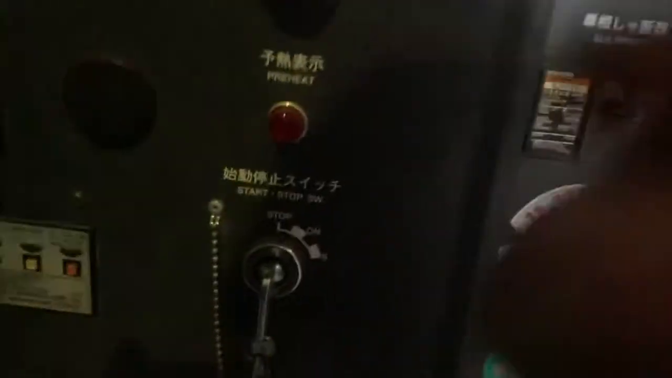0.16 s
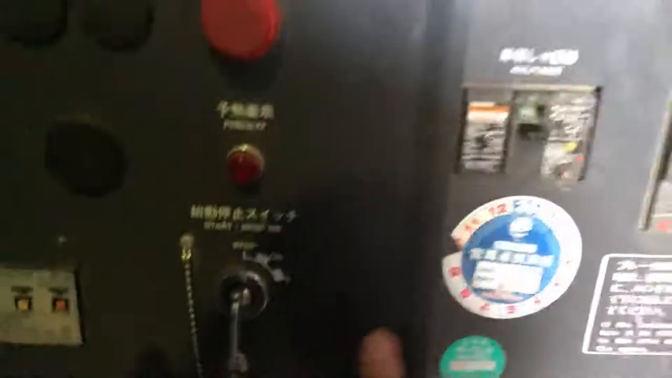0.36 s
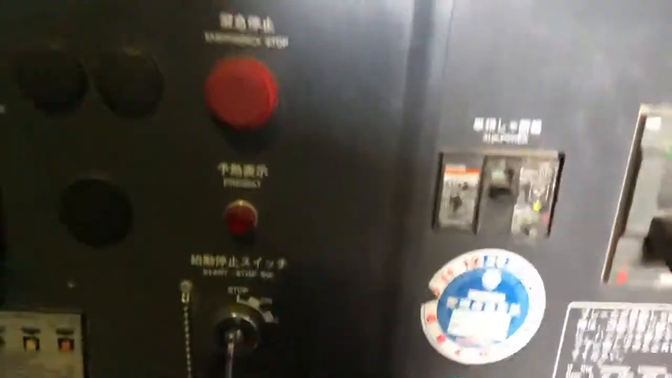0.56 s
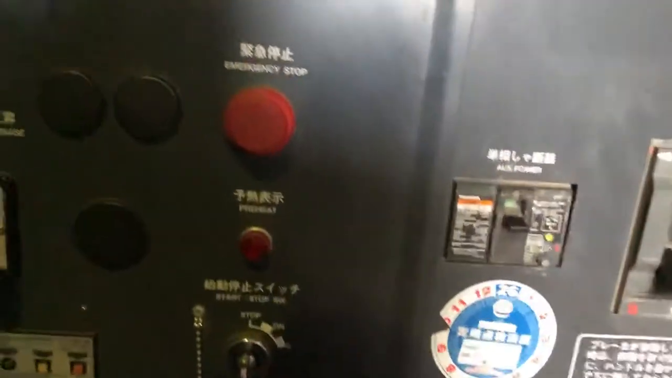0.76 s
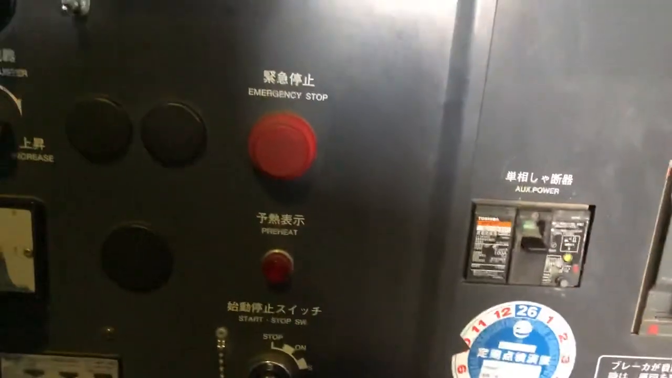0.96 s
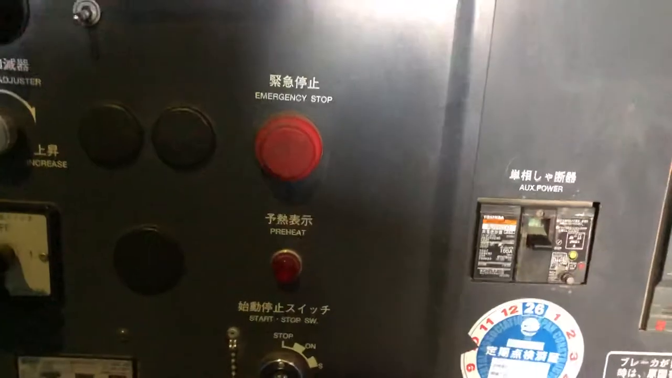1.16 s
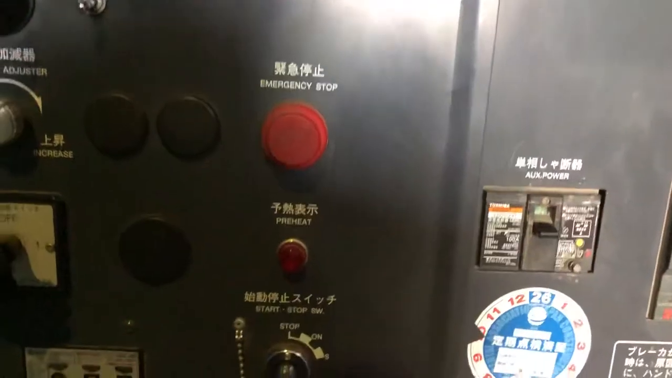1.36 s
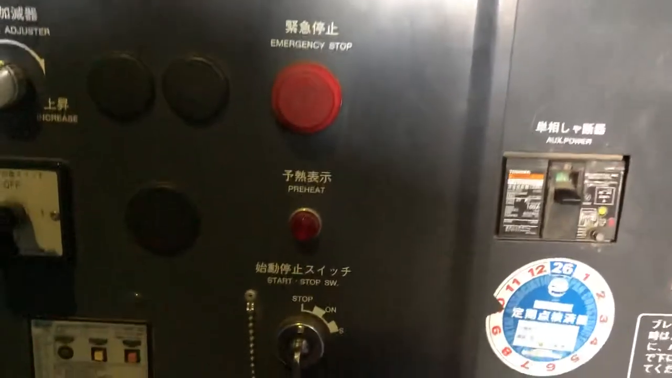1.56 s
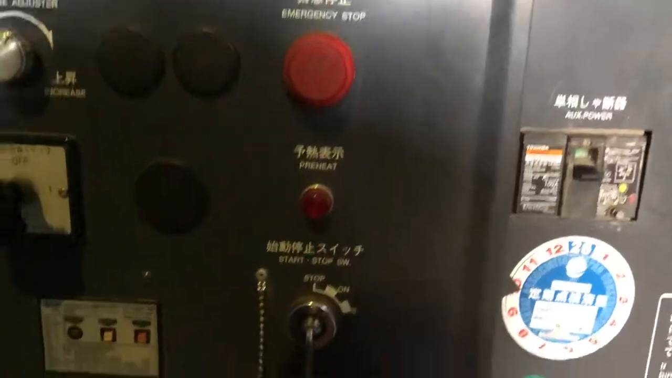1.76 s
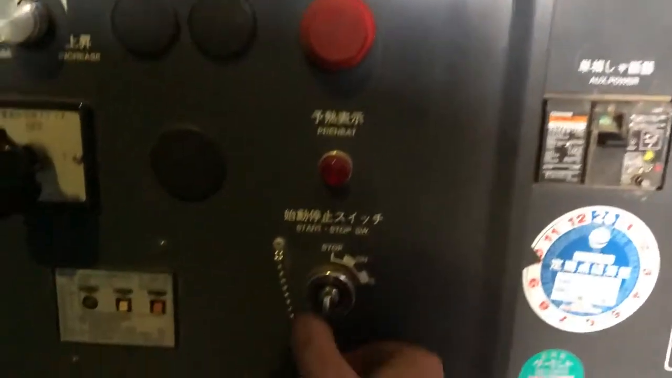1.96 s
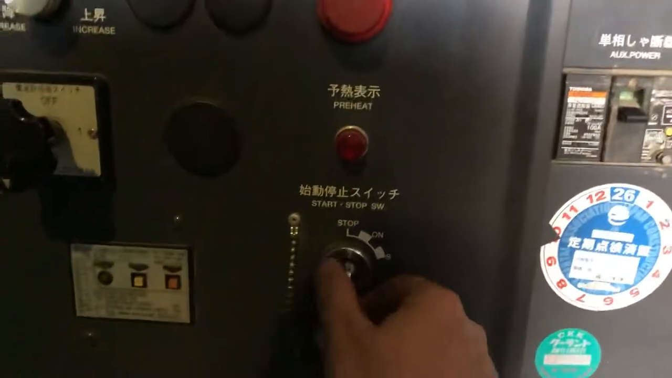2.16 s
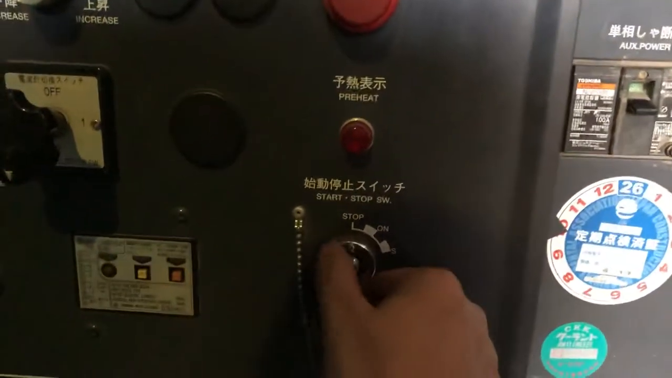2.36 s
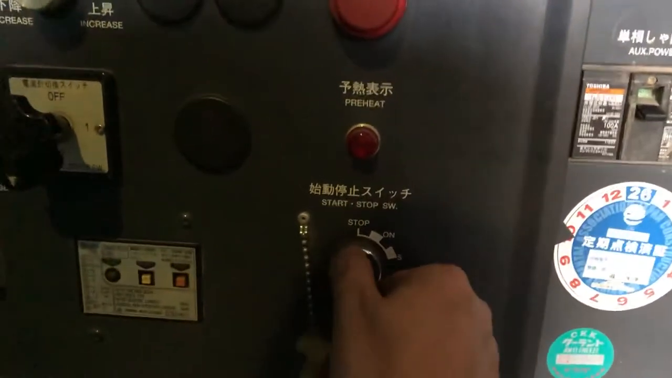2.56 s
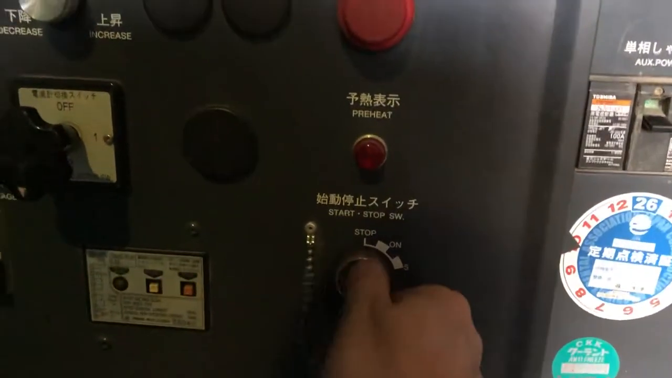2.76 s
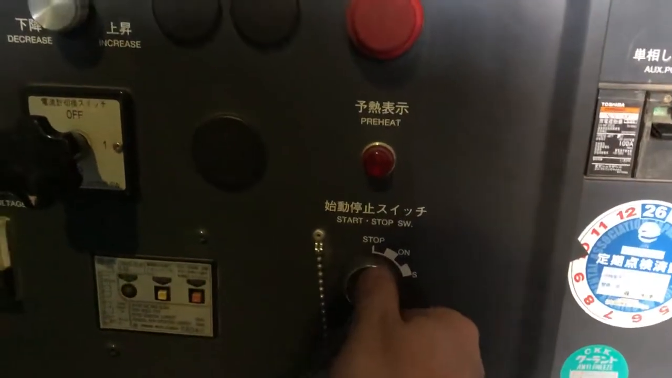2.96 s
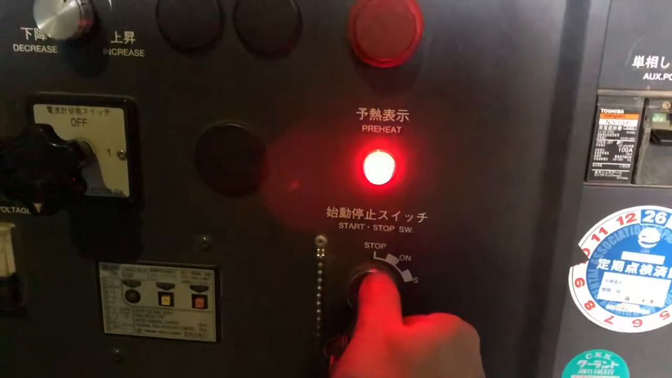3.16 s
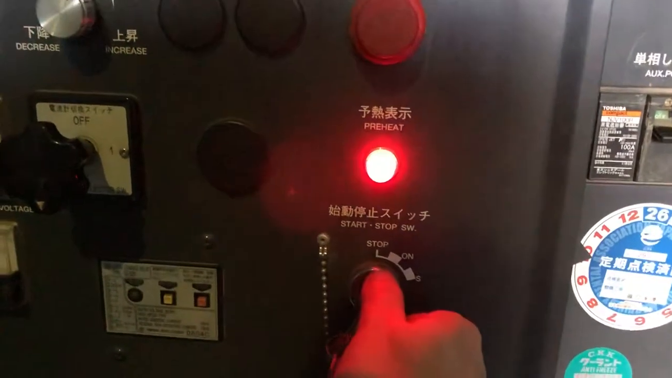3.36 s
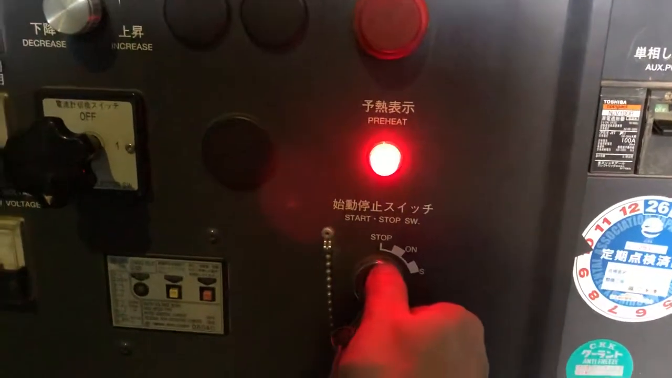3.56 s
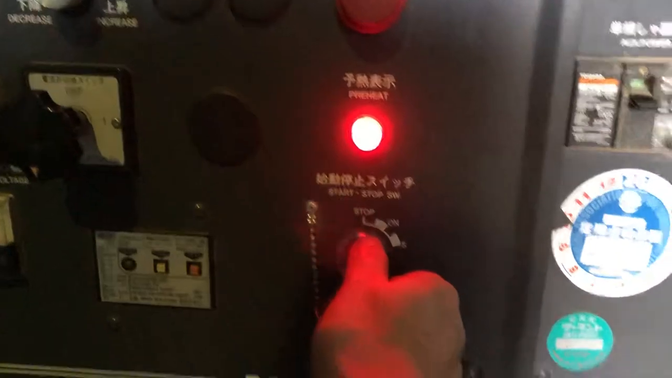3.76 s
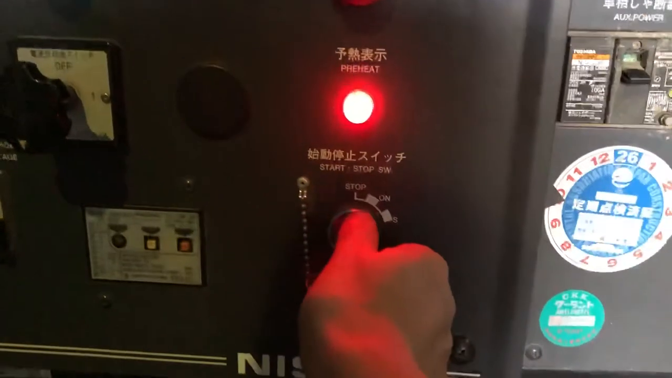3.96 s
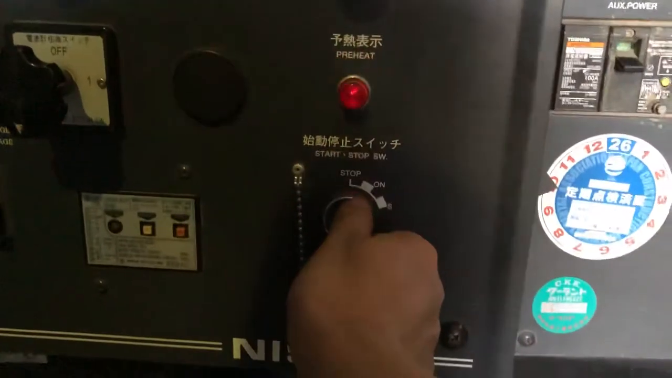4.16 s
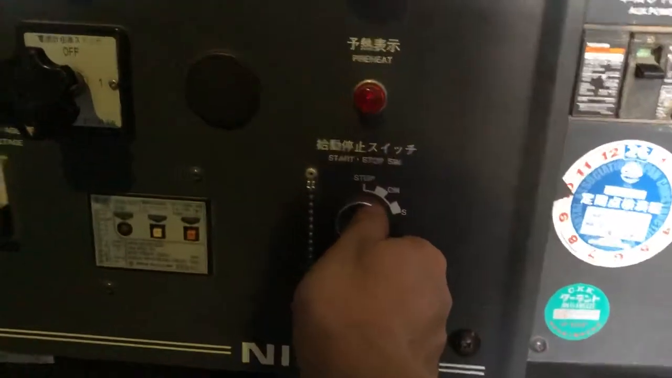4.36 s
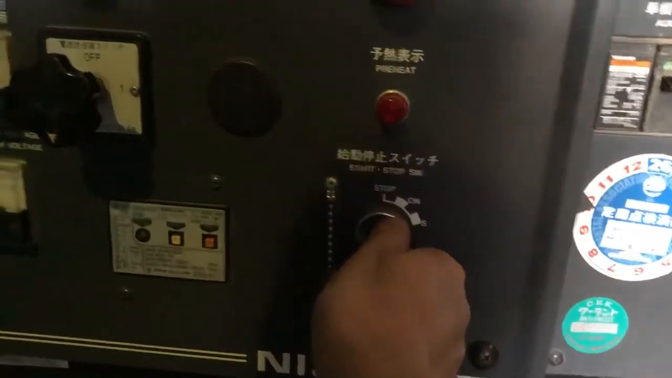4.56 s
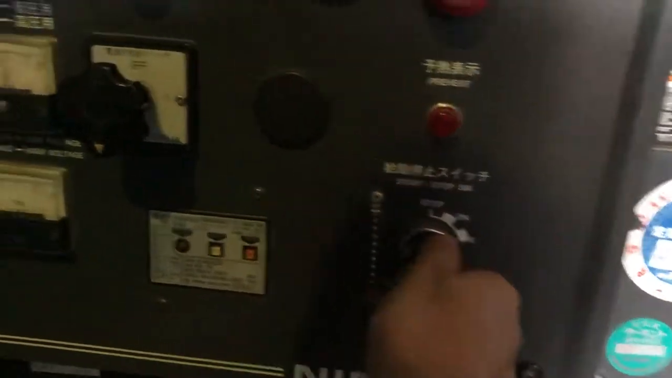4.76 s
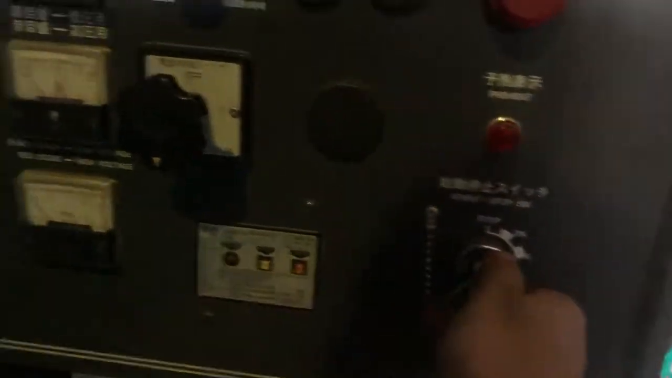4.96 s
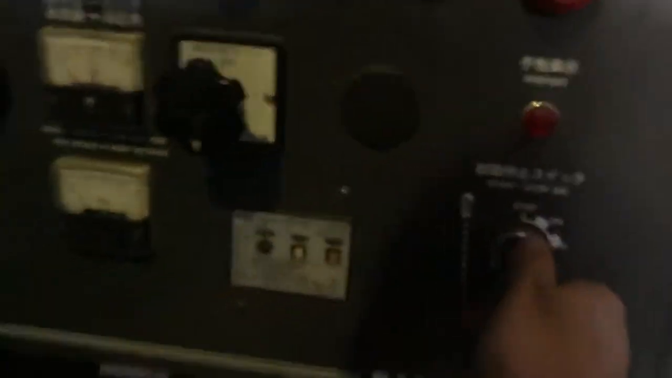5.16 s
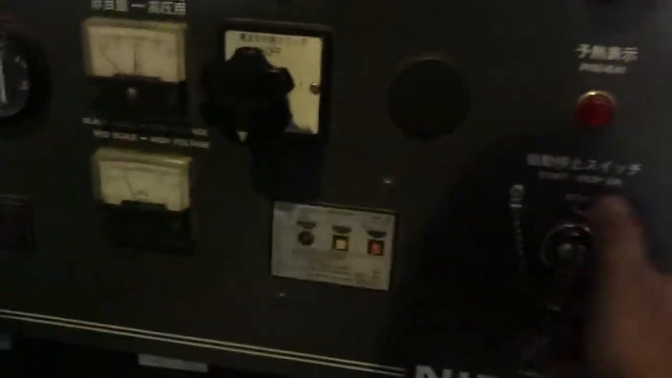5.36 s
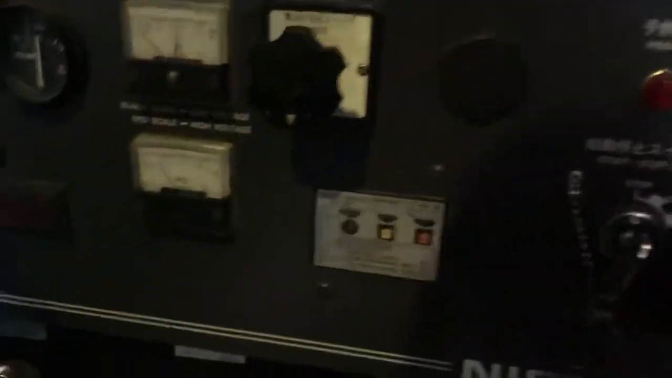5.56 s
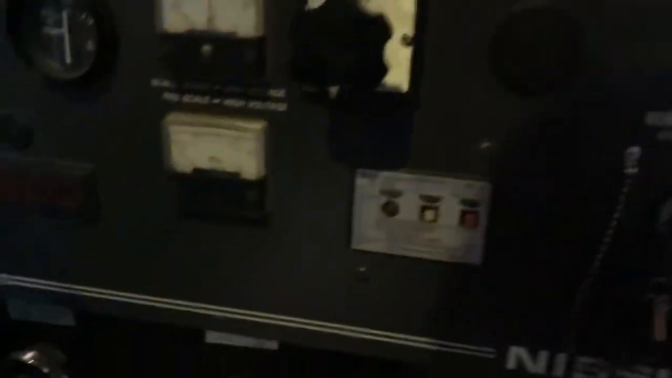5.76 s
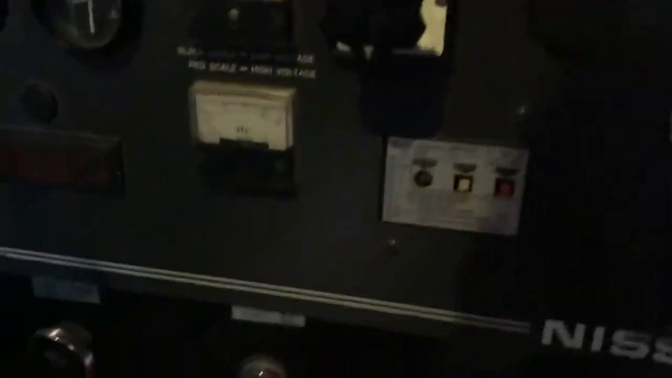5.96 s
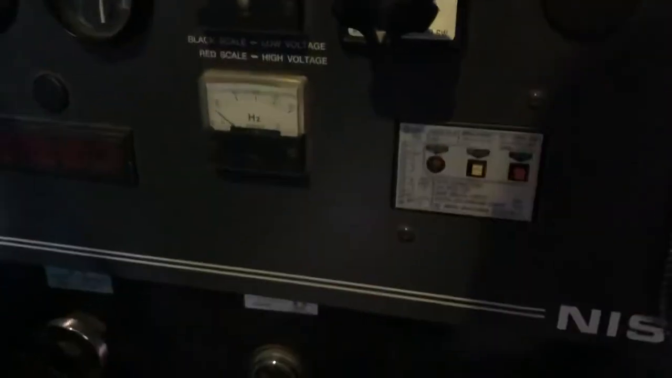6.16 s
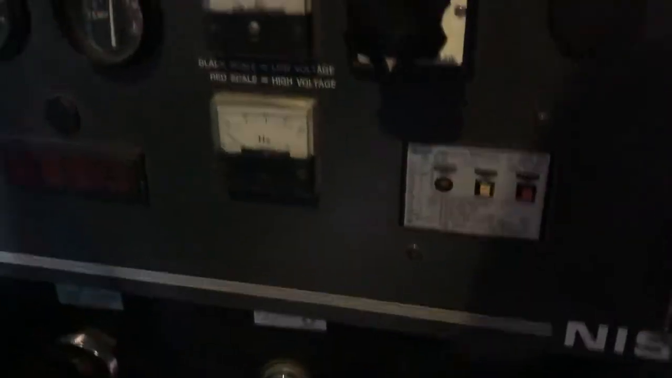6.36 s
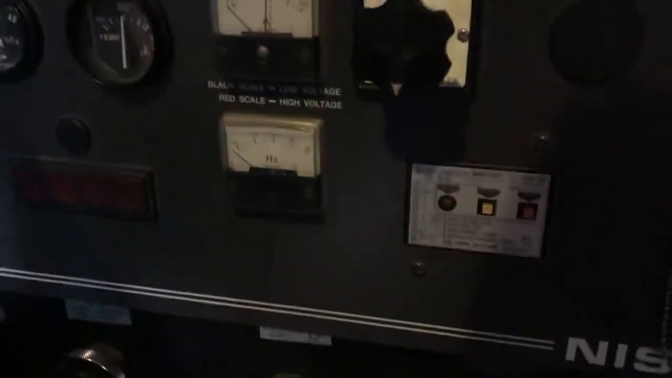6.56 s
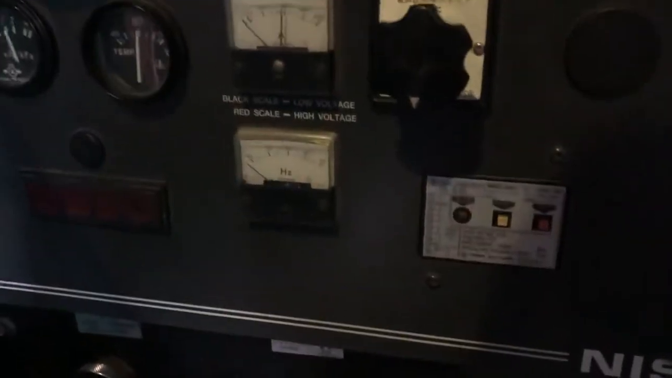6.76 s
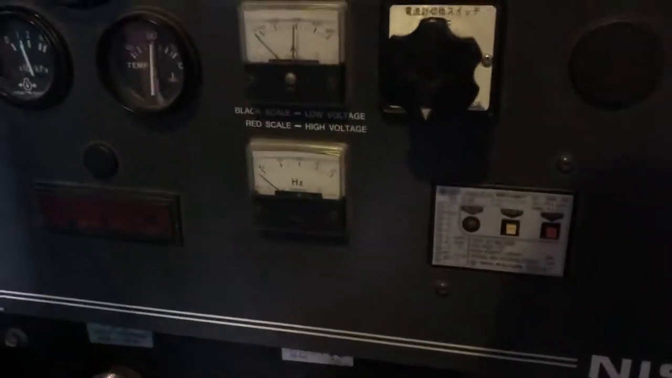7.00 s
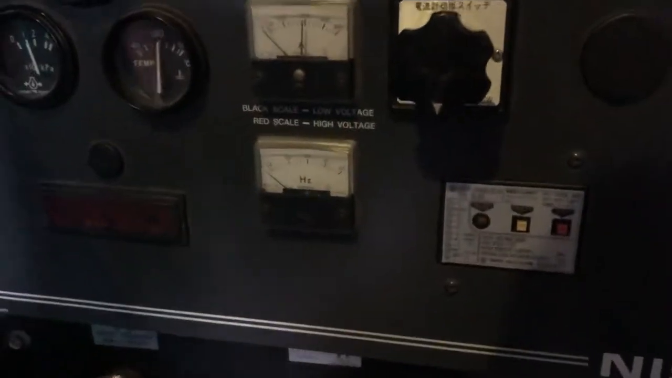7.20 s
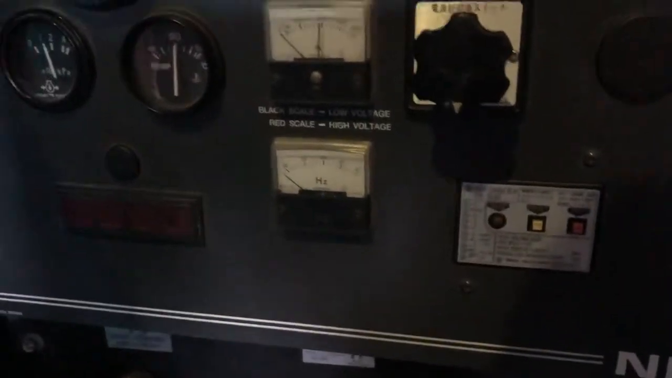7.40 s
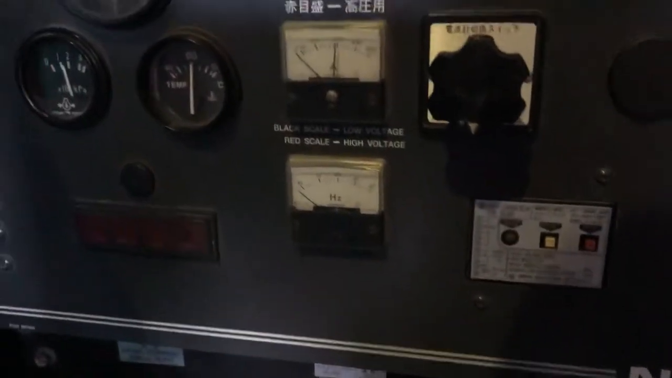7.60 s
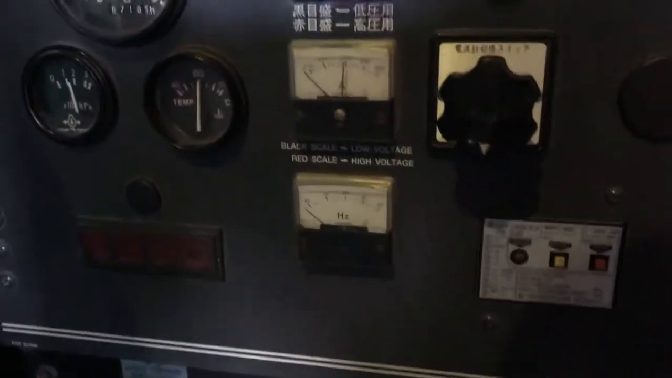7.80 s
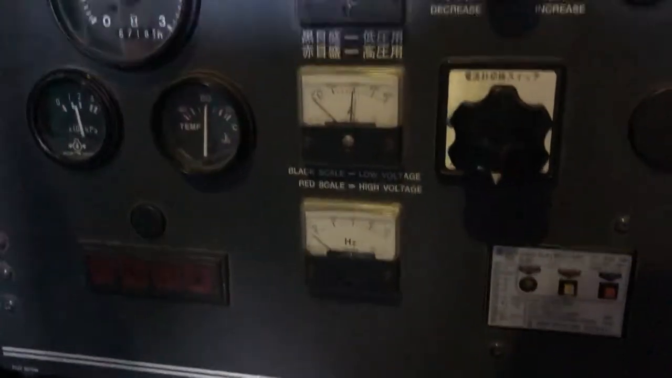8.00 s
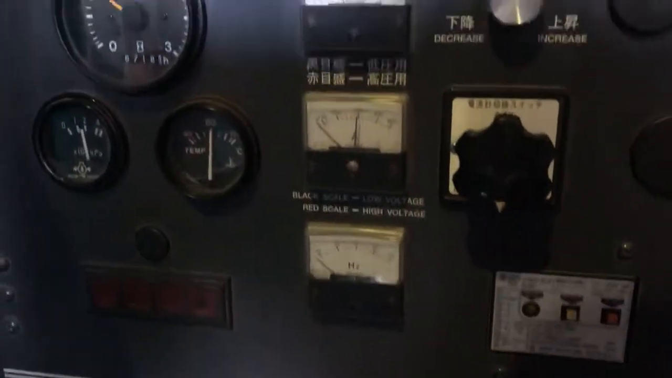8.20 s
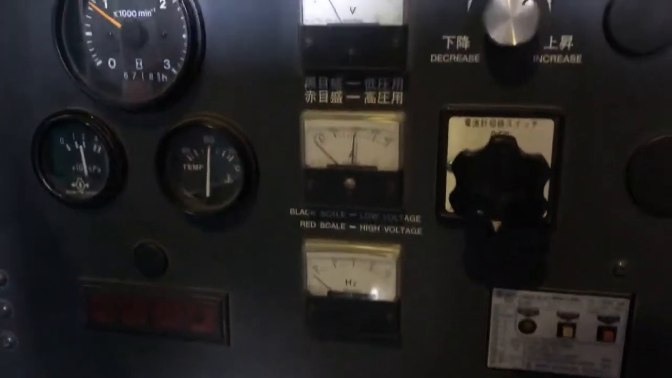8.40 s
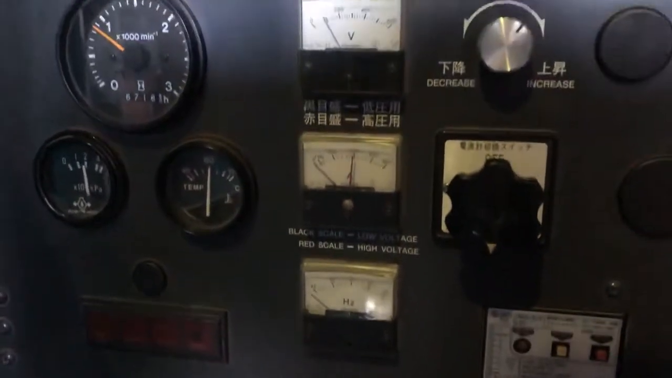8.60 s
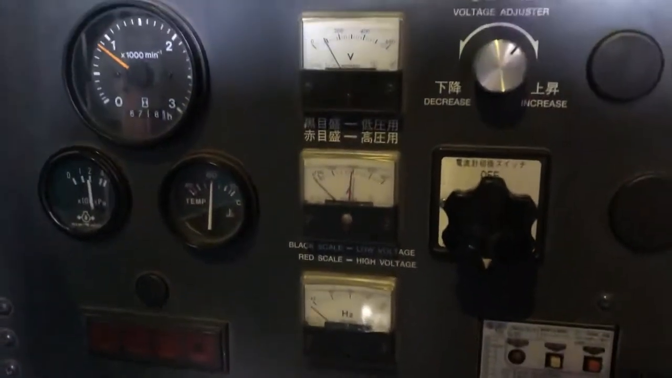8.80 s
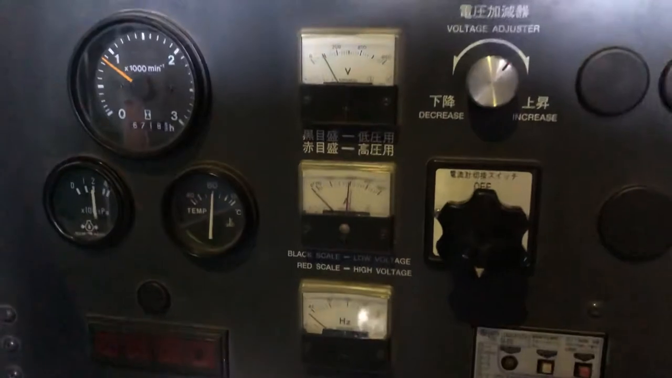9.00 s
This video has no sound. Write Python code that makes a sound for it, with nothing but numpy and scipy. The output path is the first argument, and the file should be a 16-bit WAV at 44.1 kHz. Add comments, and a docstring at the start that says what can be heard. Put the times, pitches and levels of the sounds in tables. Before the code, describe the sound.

A diesel generator starts up indoors, with one microphone in front of its control panel. First come light jingles of a key chain and a cluster of sharp switch clicks over faint, far-off machines. Then the starter slams in, cranks for a moment and whines free as the engine fires. The engine speeds up and runs steadily, knocking in its steel cabinet over a throbbing exhaust and humming fan, while an airy hiss thins.

```python
"""A six-cylinder diesel generator starting up in a plant room, one microphone in front of its panel.
Over a murmur of distant machinery the key chain ticks and slides; the switch and preheat relay snap.
The starter pinion slams in and growls against compression. The engine catches and spins the starter
free in a whine and rasp, overshoots, then idles: each cylinder knocks in the steel cabinet over the
exhaust throb, the hum of the fan and a thinning hiss of cooling air."""
import sys
import numpy as np
from scipy import signal
from scipy.fft import rfft, irfft
from scipy.io import wavfile
from scipy.ndimage import uniform_filter1d

SR = 44100
rng = np.random.default_rng(int(sys.argv[2]) if len(sys.argv) > 2 else 0)


def dump(signal):
    """Clip the signal to [-1, 1] and save it as 16-bit WAV at the path in sys.argv[1]."""
    limited = np.clip(np.atleast_2d(signal).T, -1, 1)
    pcm = np.round(limited * 32767).astype(np.int16)
    wavfile.write(sys.argv[1], SR, pcm)


N = 398663
TIME = np.arange(N) / SR
MESH_S, CATCH_S, KEY_RELEASE_S = 4.41, 4.812, 5.255  # gear bites, engine fires, key is let go

# Each source's broad colour at the microphone. Each row: frequency in Hz, relative level in dB.
ROOM_SPECTRUM = [(15, -50), (25, -30), (48, -2.5), (100, -2), (170, -4.5), (250, -6.5), (330, -12.5),
                 (463, -11.5), (695, -13.5), (1040, -16), (1800, -19), (4500, -29), (7000, -36.5),
                 (16000, -52)]
SLIDE_SPECTRUM = [(2000, -25), (4800, 1), (9000, -11), (16000, -12)]
SNAP_SPECTRUM = [(400, -22), (800, -9), (1150, 2), (2000, 0), (3400, 0), (6000, -1.5), (8000, -2),
                 (12000, -6.5), (15800, -15)]
THUD_SPECTRUM = [(20, -34), (45, -9), (120, -8.5), (280, -0.5), (700, -0.5), (1000, -1), (1400, -9.5),
                 (3300, -5.5), (6000, -17), (16000, -30)]
HOUSING_SPECTRUM = [(60, -3.5), (180, -10), (300, 0.5), (480, -4), (700, -1), (1000, -5), (1550, 0.5),
                    (1900, -1), (2200, -1.5), (3200, -4.5), (4500, -21.5), (8000, -21), (16000, -40)]
CLUTCH_SPECTRUM = [(30, -19), (300, 7), (1000, -0.5), (2100, 2), (2800, 4), (3500, 3), (4500, -1),
                   (7000, -6), (10000, -13), (13000, -20), (15800, -16)]
BLOCK_SPECTRUM = [(150, -27.5), (350, 2.5), (480, 3.5), (650, 0.5), (1050, 1.5), (1500, -1), (2000, -0.5),
                  (2300, -4), (2800, -8.5), (4000, -18.5), (5000, -17), (8000, -26), (16000, -42.5)]
INJECTOR_SPECTRUM = [(1500, -35), (2300, -15), (2750, -4), (3100, -6), (3700, 2), (4100, -4), (4700, -14),
                     (8000, -19), (16000, -34)]
CABINET_SPECTRUM = [(22, -60), (31, -30), (42, -12), (60, -3.5), (85, 0), (135, -2.5), (160, -7),
                    (215, -2.5), (270, -6.5), (340, -3.5), (390, -12), (480, -9.5), (600, -27.5),
                    (1500, -58.5)]
AIR_SPECTRUM = [(1500, -25), (4000, 8.5), (5500, -2), (8000, 1.5), (10500, -3), (13000, -10), (15800, -9)]
# Resonances of the room and the metal parts. Each row: frequency in Hz, width in Hz, strength in dB.
ROOM_MODES = [(97.6, 3.1, 8), (349, 2.9, 10.5), (393, 13, -0.5), (456.6, 1.6, 18), (465.5, 4.7, 8),
              (1057, 46, 0.5), (1872, 29, 4)]
KEY_MODES = [(4870, 58, -33), (6180, 46, -1), (7640, 65, -2), (8390, 49, -3), (10200, 33, 15.5),
             (10750, 110, 5), (11000, 80, -4), (12900, 200, -2), (15400, 150, -1)]
SLIDE_MODES = [(4800, 400, 9), (8400, 150, 6), (10350, 200, 9)]
SNAP_MODES = [(1350, 29, 1.8), (1525, 19, 2.1), (3360, 30, 1.9), (4530, 68, 4), (5200, 200, 2),
              (6100, 90, 2), (10250, 33, 4.6), (15700, 200, 3)]
PANEL_MODES = [(217, 28, 3.6), (263, 41, 1), (318, 13, 5.5), (580, 19, 3), (1427, 29, 17.6),
               (1550, 25, 8.6), (1680, 26, 4.5), (3340, 40, 11), (3650, 53, 5)]
HOUSING_MODES = [(1514, 80, -1), (2970, 500, -9)]
BLOCK_MODES = [(815, 45, -3), (1066, 45, 0), (1281, 40, -2), (1530, 60, -7), (1733, 30, -4), (1882, 30, 3),
               (2030, 55, -2)]
INJECTOR_MODES = [(2730, 430, 8), (3285, 24, 10.5), (3763, 13, 1)]
CABINET_MODES = [(87.8, 3.3, -3), (108.9, 2.65, 13.5), (268, 14, -1.5)]
# Spells of faint jingling. Each row: start and end in seconds, level in dB, brightness (0 is neutral).
JINGLES = [(0.031, .95, -44.5, -2.5), (1.75, 2.3, -46.5, 2.5), (2.4, 3.15, -52, 4)]
# Clear touches of key and chain. Each row: start in seconds, level in dB, brightness.
KEY_TICKS = [(.1, -44, -2), (.321, -43, -2.5), (.763, -39, 0), (.775, -40, 1), (1.206, -34, 0.8),
             (1.595, -38, -1.5), (1.61, -32, -1.5), (1.784, -31, 5.5), (1.803, -47, 4), (1.864, -29, -3.5),
             (1.971, -37.5, 0.5), (2.009, -40, 2), (2.034, -36, 1.5), (2.131, -40, 2), (2.27, -45, 2),
             (2.402, -39, 0), (2.648, -40, 3), (3.285, -49, 3)]
# The chain sliding on the panel. One row: start and fade-out time in seconds, level in dB.
SLIDE = (0.86, 2.7, -68)
# Switch, relay, solenoid and pinion blows. Each row: start in seconds, snap level in dB, thud level
# in dB, the snap's t60 in seconds.
BLOWS = [(2.719, -9.5, -31, 0.025), (2.761, -14.5, -29, 0.035), (2.772, -20, -32, 0.073),
         (2.8, -19.5, -22.5, 0.047), (2.808, -25.5, -20, 0.057), (4.371, -29.5, -46, 0.26),
         (4.388, -17, -18, .093), (4.416, -11.5, -23, 0.082), (4.45, -21, -11, 0.093),
         (4.809, -16.5, -17, .044), (5.217, -9, -28.5, .055), (5.245, -14.5, -16, 0.076)]
# The key's return spring. One row: start and end in seconds, pitch in Hz, level in dB.
SPRING = (2.719, 2.76, 8452, -31)
# The starter labouring against compression. Each row: time in seconds, tooth rate in Hz.
TOOTH_RATE = [(4.43, 214.1), (4.5, 180.2), (4.55, 218.4), (4.635, 309.6), (4.67, 325.3), (4.76, 267.5)]
# The crankshaft running up, overshooting and settling. Each row: time in seconds, speed in rpm.
CRANK_SPEED = [(4.812, 140), (5.012, 459), (5.2, 642), (5.36, 880), (5.47, 894), (5.64, 858), (5.9, 871.3),
               (6.7, 874.8)]
# The governor gives full fuel, cuts it and finds idle. Each row: time in seconds, fuel in dB over idle.
FUEL = [(5.45, 4), (5.56, -6.5), (5.76, 1.5), (6.3, 0), (8, -0.5)]
# How a part follows the engine. Each: gain at idle in dB, dB per dB of fuel, dB per doubling of speed.
KNOCK_LAW = (-20, .25, 0.62)
BOOM_LAW = (-16.5, .5, 3)
EXHAUST_LAW = (-3, 1, 15.9)
FAN_LAW = (0.33, 0.043, 19)
# Cylinders in firing order. Each row: knock and injector tick, both in relative dB.
CYLINDERS = [(3, -4), (-2, -7), (1.5, -2), (-2, -6), (2, 3.5), (0, -4)]
# The exhaust note. Each row: multiple of the firing rate, relative level in dB.
EXHAUST_HARMONICS = [(1, -22.5), (2, -17.5), (3, -25), (4, -26.5), (5, -45), (6, -34), (7, -23.5), (8, -28)]
# Cooling air at the microphone. Each row: time in seconds, level in dB at idle speed.
DRAUGHT = [(6.2, -33), (8, -42.5)]


def undb(db):
    """Decibels to gain."""
    return 10 ** (np.asarray(db) / 20)


def unit(x):
    """Scale to rms 1."""
    return x / np.sqrt(np.mean(x ** 2))


def curve(table):
    """Rows of time and value as a curve over the scene."""
    return np.interp(TIME, *np.transpose(table))


def noise(size=N):
    """White noise."""
    return rng.standard_normal(size)


def walk(rate):
    """Smooth random wander of rms 1, with rate fresh values a second."""
    k = int(SR / rate)
    steps = np.repeat(noise(N // k + 1), k)
    return unit(uniform_filter1d(uniform_filter1d(steps, k), k)[:N])


def fade(t60, size):
    """Exponential decay, 60 dB in t60 seconds."""
    return np.exp(-np.log(1000) * np.arange(size) / SR / t60)


def envelope(start, attack, t60, until=0):
    """Rise from start, hold until a given time (if any), then die away; all in seconds."""
    dying_s = np.maximum(TIME - max(start + attack, until), 0)
    return np.clip((TIME - start) / attack, 0, 1) * np.exp(-np.log(1000) * dying_s / t60)


def add(out, start, sound):
    """Mix a sound in at start seconds."""
    i = int(start * SR)
    out[i:i + len(sound)] += sound[:len(out) - i]


def body(x, spectrum, modes=(), size=16384):
    """Ring x through a causal response of unit energy: a broad spectrum with resonances on it."""
    hz = np.maximum(np.arange(size // 2 + 1) * SR / size, 1)
    points, db = np.transpose(spectrum)
    gain = undb(np.interp(np.log(hz), np.log(points), db))
    gain *= 1 + sum(undb(peak) / (1 + (2 * (hz - centre) / width) ** 2) for centre, width, peak in modes)
    cepstrum = irfft(np.log(gain))[:size // 2]
    response = irfft(np.exp(rfft(2 * cepstrum, size)))[:size // 2]
    return signal.oaconvolve(x, response / np.linalg.norm(response))[:len(x)]


def casing(x, t60, size=2048):
    """Crowded modes of a steel casing smear each impulse in time and leave its colour alone."""
    spectrum = rfft(noise(size) * fade(t60, size))
    smear = np.roll(irfft(spectrum / np.abs(spectrum)), size // 2)
    return signal.oaconvolve(x, smear, mode="same")


def ring(start, hz, db, t60):
    """One struck resonance."""
    return undb(db) * envelope(start, 0.0091, t60) * np.sin(2 * np.pi * hz * (TIME - start))


def distant_machinery():
    """Far-off machines murmur in the room's resonances."""
    return body(noise(), ROOM_SPECTRUM, ROOM_MODES) * undb(-44.5 + 0.98 * walk(2.88))


def wall_echo(x, t60, size=30000):
    """The plant room's hard walls return a dull tail."""
    colour = [(60, 18), (1500, 4), (4000, -1.5), (8000, -6), (16000, -10)]
    tail = body(noise(size) * fade(t60, size), colour)
    return signal.oaconvolve(x, tail / np.linalg.norm(tail))[:N]


def key_chain(jingles_per_spell=6, size=7000):
    """Key and chain touch the lock: dull touches are dry, bright ones set the small links ringing."""
    touches = list(KEY_TICKS)
    for start, stop, db, brightness in JINGLES:
        for k in range(jingles_per_spell):
            when = start + (stop - start) * (k + rng.random()) / jingles_per_spell
            touches.append((when, rng.normal(db, 2), brightness))
    shape = np.minimum(TIME[:size] / 0.0013, 1) * (fade(0.036, size) + 0.039 * fade(0.17, size))
    out = np.zeros(N)
    for start, db, brightness in touches:
        contact = noise(size) * shape
        colour = [(400, -23), (1200, -2 * brightness), (4800, 4.5), (16000, 4.7 * brightness - 8.5)]
        links = [(hz, width, rng.normal(peak + 3 * brightness, 3)) for hz, width, peak in KEY_MODES]
        add(out, start, undb(db) * body(contact, colour, links, size=8192))
    return out


def chain_slide():
    """Links rub over the painted steel in uneven strokes, squeaking faintly."""
    start, stop, db = SLIDE
    pressure = envelope(start, attack=0.3, t60=2.5, until=stop) * undb(db + 4.5 * walk(7))
    return pressure * body(noise(), SLIDE_SPECTRUM, SLIDE_MODES)


def switchgear(size=12000):
    """Each blow is a bright snap of steel parts and a duller, longer thud of the panel behind them."""
    snaps, thuds = np.zeros(N), np.zeros(N)
    for start, snap_db, thud_db, t60 in BLOWS:
        add(snaps, start, undb(snap_db) * noise(size) * fade(t60, size))
        add(thuds, start, undb(thud_db) * noise(size) * fade(1.82 * t60, size))
    return body(snaps, SNAP_SPECTRUM, SNAP_MODES) + body(thuds, THUD_SPECTRUM, PANEL_MODES)


def key_spring():
    """The return spring sings until the next detent stops it."""
    start, stop, hz, db = SPRING
    return undb(db) * np.sin(2 * np.pi * hz * TIME) * (TIME > start) * (TIME < stop)


def starter_gear(strokes_per_s=7.66, kick_hz=468, housing_hz=455):
    """Pinion teeth strike the ring gear, slowed by compression, until the first firing kicks it ahead."""
    cranking = TIME < CATCH_S
    tooth_hz = np.where(cranking, curve(TOOTH_RATE), kick_hz)
    teeth = np.cumsum(tooth_hz * (1 + 0.014 * walk(150))) / SR
    # Worn teeth strike unevenly and scrape.
    strikes = unit(np.diff(np.floor(teeth), prepend=0) * undb(3 * walk(400)) - tooth_hz / SR)
    scrape = unit(noise() * np.exp(-(teeth % 1) / 0.49))
    rattle = body(casing(strikes + 0.7 * scrape, t60=0.031), HOUSING_SPECTRUM, HOUSING_MODES)
    rattle *= undb(np.where(cranking, -5, -7))
    # The mesh tone and its octave boom as they pass through the flywheel housing's resonance.
    mesh = sum(gain * np.sin(2 * np.pi * k * teeth) / (1 + ((k * tooth_hz - housing_hz) / 150) ** 4)
               for k, gain in [(1, 1.6), (2, 0.6)])
    mesh *= undb(1.4 * walk(120))
    # Each compression stroke leans on the gear; after the kick it buzzes on as it unloads.
    swell_db = 2 * np.cos(2 * np.pi * strokes_per_s * (TIME - CATCH_S))
    load = undb(-14 + swell_db) * envelope(MESH_S, attack=0.032, t60=0.48, until=4.75)
    kick = undb(-5.5) * envelope(CATCH_S, attack=0.009, t60=0.075)
    buzz = undb(-22) * envelope(CATCH_S, attack=0.009, t60=0.7)
    clunk = ring(4.419, hz=213, db=-12.5, t60=0.08)  # the pinion hits its stop
    return clunk + np.where(cranking, load, kick + buzz) * (rattle + mesh)


def speed_doublings():
    """Engine speed in doublings from idle."""
    return np.log2(curve(CRANK_SPEED) / CRANK_SPEED[-1][1])


def starter_clutch():
    """The pinion grates in; its clutch rasps as the engine outruns it and fades once the key is let go."""
    grate = undb(-16) * envelope(4.425, attack=0.022, t60=0.061, until=4.475)
    slip_db = -11.5 + 7.5 * speed_doublings()
    slip = undb(slip_db) * envelope(MESH_S, attack=0.032, t60=0.13, until=KEY_RELEASE_S)
    coast = undb(-27.5) * envelope(KEY_RELEASE_S, attack=0.032, t60=0.79)
    return (grate + slip + coast) * body(noise() * undb(1.4 * walk(500)), CLUTCH_SPECTRUM)


def starter_motor(freed_s=4.735, start_hz=2900, top_hz=7970, rise_s=0.22, sag_hz_per_s=350):
    """Relieved of its load the motor whines upwards; switched off, it coasts with a sinking whirr."""
    whine_hz = top_hz + (start_hz - top_hz) * np.exp(-np.maximum(TIME - freed_s, 0) / rise_s)
    whine_hz *= 1 + 0.0254 * walk(900)
    whine = casing(np.sin(2 * np.pi * np.cumsum(whine_hz) / SR), t60=0.042)
    whirr_hz = 2896 - sag_hz_per_s * (TIME - KEY_RELEASE_S)
    whirr_hz *= 1 + 0.08 * walk(1500)
    whirr = casing(np.sin(2 * np.pi * np.cumsum(whirr_hz) / SR), t60=0.026)
    return (undb(-23.5) * whine * envelope(freed_s, attack=0.016, t60=0.7)
            + undb(-26.5) * whirr * envelope(KEY_RELEASE_S, attack=0.016, t60=4))


def effort(law):
    """Gain of a part that grows louder with fuel and speed."""
    idle_db, per_fuel, per_doubling = law
    return undb(idle_db + per_fuel * curve(FUEL) + per_doubling * speed_doublings())


def knocks(firings, cylinder_db, t60, repeat, scatter_db, size=6000):
    """Each cylinder rattles the same parts every cycle: a share repeats, the rest is fresh chance."""
    out = np.zeros(N)
    signatures = noise((len(cylinder_db), size))
    shape = fade(t60, size) * np.minimum(TIME[:size] / 0.0025, 1)
    for k, start in enumerate(firings):
        cylinder = k % len(cylinder_db)
        rattle = np.sqrt(repeat) * signatures[cylinder] + np.sqrt(1 - repeat) * noise(size)
        add(out, start, rattle * shape * undb(rng.normal(cylinder_db[cylinder], scatter_db)))
    return out / np.std(out[-2 * SR:])  # rms 1 at idle


def diesel_knock(firings):
    """Each firing knocks the block, ticks in the injector pipes and thumps the steel cabinet."""
    knock_db, tick_db = np.transpose(CYLINDERS)
    blows = knocks(firings, knock_db, t60=0.24, repeat=0.51, scatter_db=0.2)
    # One injector is louder than the rest: a "tsk" every second turn.
    ticks = knocks(firings, tick_db, t60=0.18, repeat=0.4, scatter_db=0.8)
    thumps = knocks(firings, 0.12 * knock_db, t60=0.16, repeat=0.17, scatter_db=0.95)
    block = body(blows, BLOCK_SPECTRUM, BLOCK_MODES)
    injectors = undb(-11) * body(ticks, INJECTOR_SPECTRUM, INJECTOR_MODES)
    cabinet = body(thumps, CABINET_SPECTRUM, CABINET_MODES)
    return effort(KNOCK_LAW) * (block + injectors) + effort(BOOM_LAW) * cabinet


def exhaust(firing_cycles):
    """Gas pulses throb in wavering harmonics of the firing rate."""
    throb = sum(undb(db + 1.25 * walk(9)) * np.sin(2 * np.pi * (k * firing_cycles + rng.random()))
                for k, db in EXHAUST_HARMONICS)
    return effort(EXHAUST_LAW) * np.sqrt(2) * throb


def fan(turns, cycles_per_turn=16):
    """The fan hums in step with the crankshaft."""
    hum = np.sqrt(2) * np.sin(2 * np.pi * cycles_per_turn * turns)
    return effort(FAN_LAW) * undb(-16.5 + 0.87 * walk(7)) * hum


def cooling_air(firing_cycles):
    """The draught hisses, pulsing with the firings, and thins as the microphone moves along the panel."""
    pulse = 1 + 0.067 * np.cos(2 * np.pi * (firing_cycles - 0.15))
    return body(noise() * pulse, AIR_SPECTRUM) * undb(curve(DRAUGHT) + 3 * speed_doublings())


def engine():
    """The diesel fires three times a turn; a few slow, early firings rock it on its frame."""
    running = TIME >= CATCH_S
    turns = np.cumsum(curve(CRANK_SPEED) * running) / 60 / SR
    firing_cycles = turns * len(CYLINDERS) / 2
    firings = TIME[1:][np.diff(np.ceil(firing_cycles)) > 0]
    jolts = sum(ring(start, hz=311, db=-12, t60=0.11) for start in firings[1:4])
    combustion = diesel_knock(firings) + jolts + exhaust(firing_cycles)
    return running * (combustion + fan(turns) + cooling_air(firing_cycles))


def scene():
    """Mono, in front of the panel: keys, switches and starter echo off the walls; the engine is direct."""
    starter = starter_gear() + starter_motor() + starter_clutch()
    start_up = key_chain() + chain_slide() + switchgear() + key_spring() + starter
    room = undb(-16) * wall_echo(start_up, t60=0.56) + distant_machinery()
    return (start_up + room + engine())[None]


def record(dry):
    """The recorder clips at full scale and cuts the top above 15.9 kHz."""
    lowpass = signal.ellip(10, 0.2, 80, 15900, fs=SR, output="sos")
    return signal.sosfilt(lowpass, np.clip(dry, -1, 1))


dry = scene()
out = record(dry)
dump(out)
```